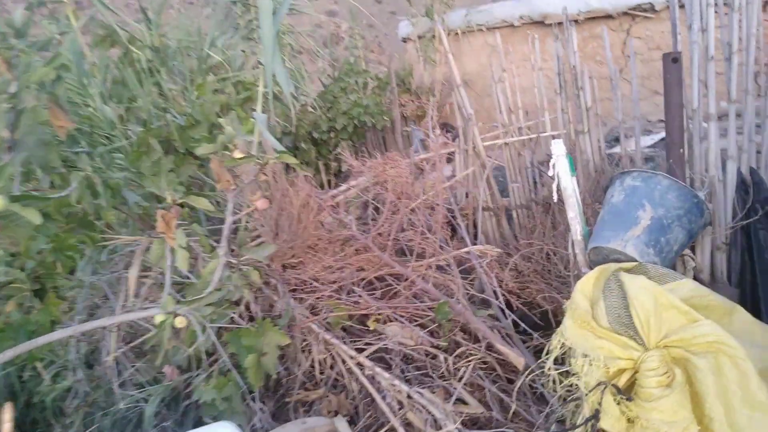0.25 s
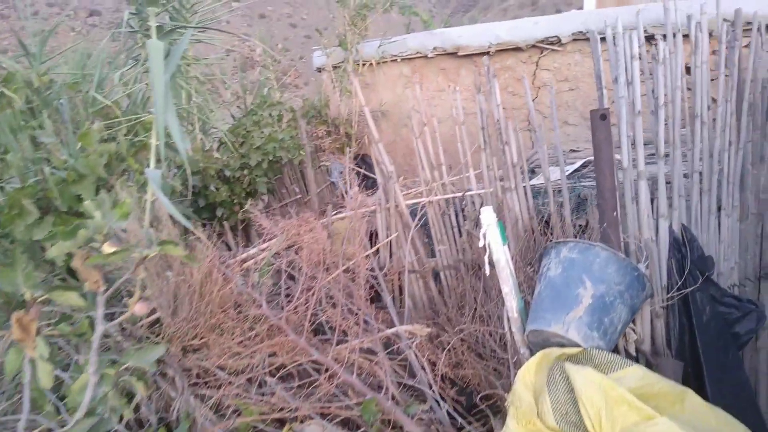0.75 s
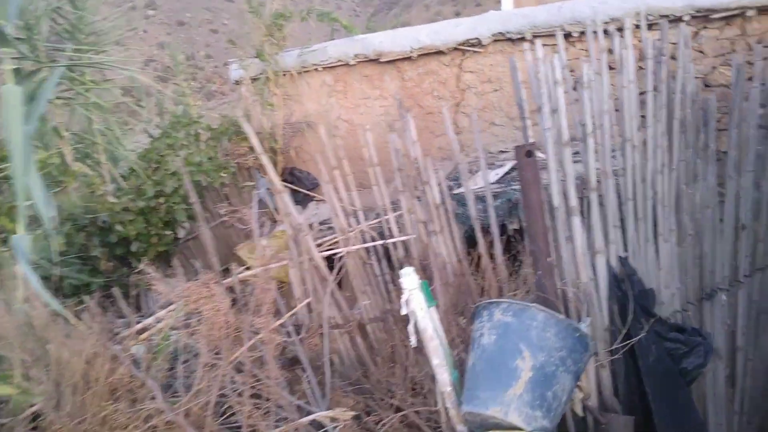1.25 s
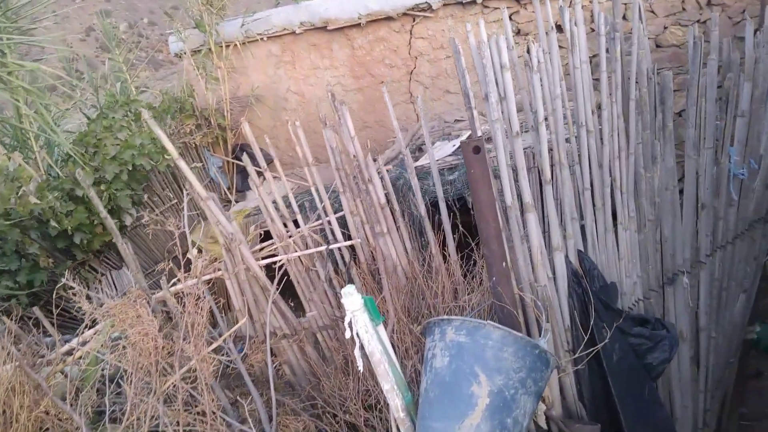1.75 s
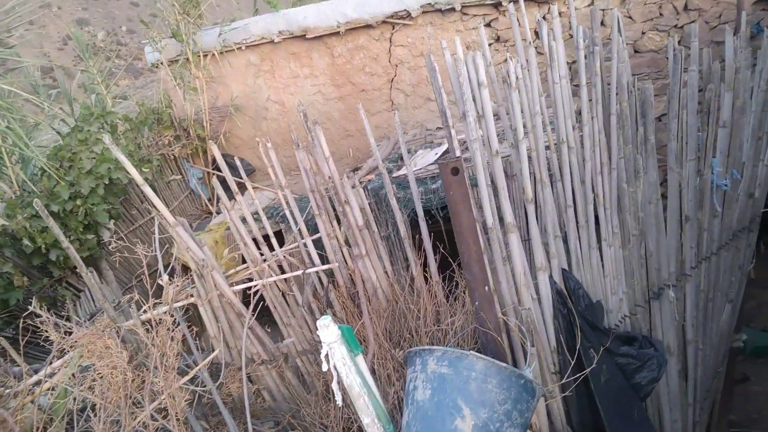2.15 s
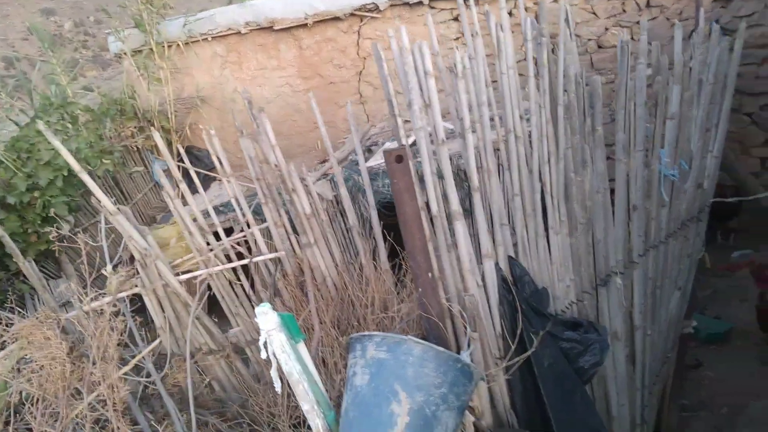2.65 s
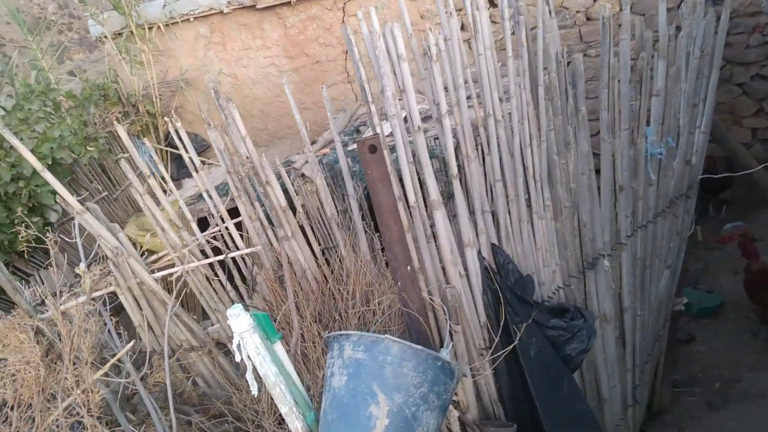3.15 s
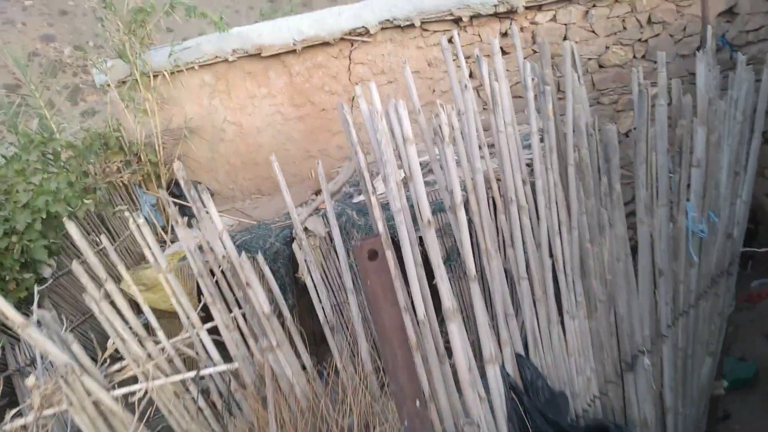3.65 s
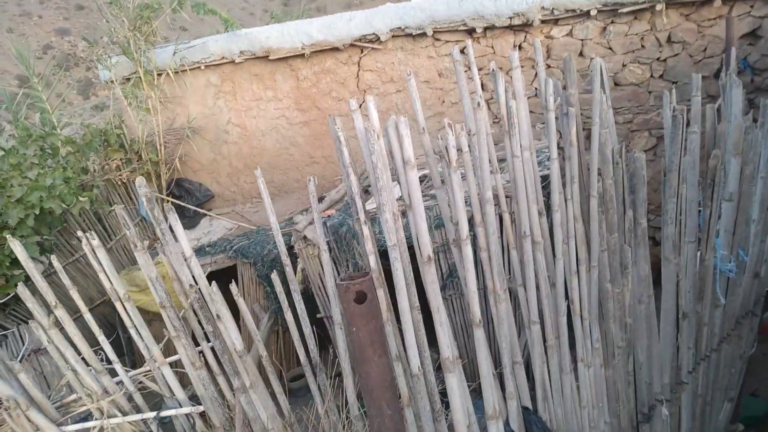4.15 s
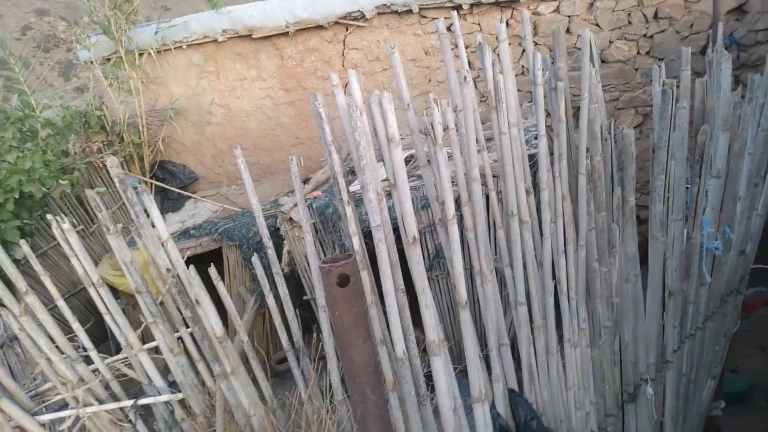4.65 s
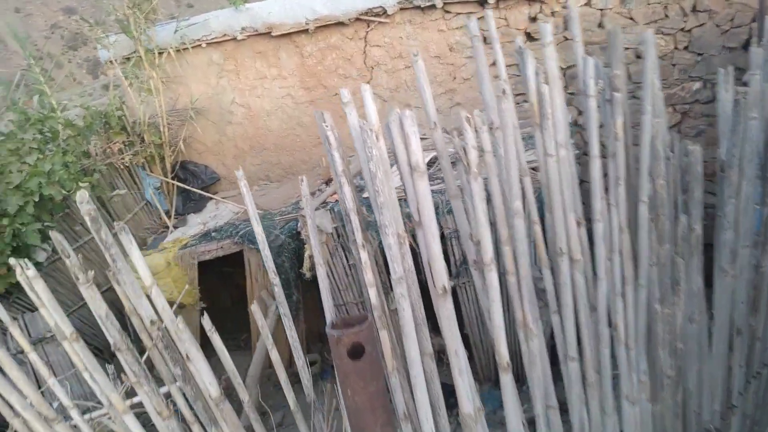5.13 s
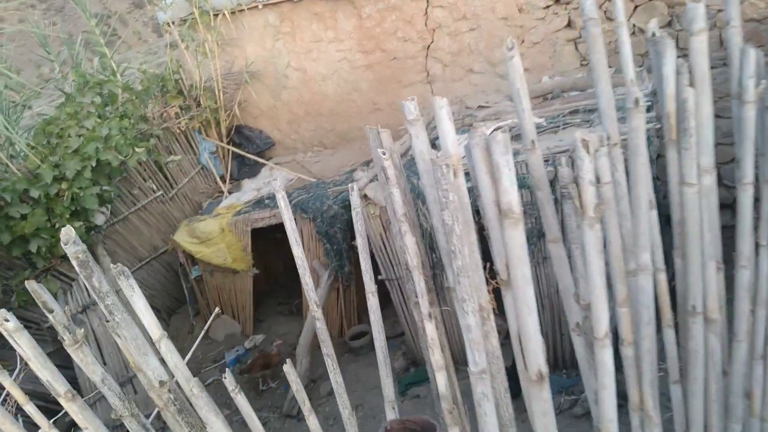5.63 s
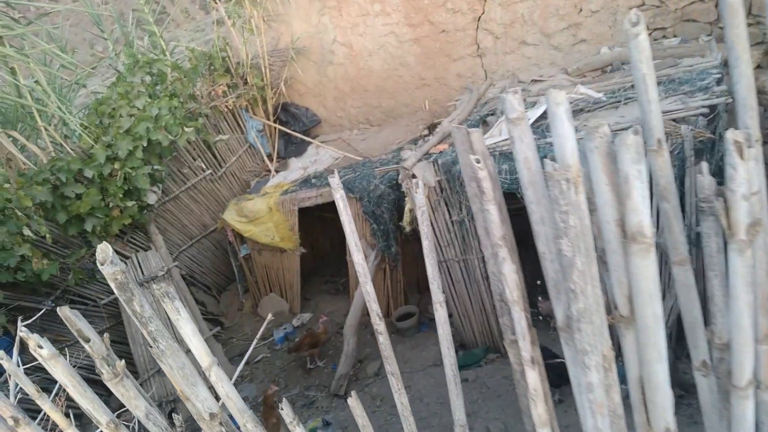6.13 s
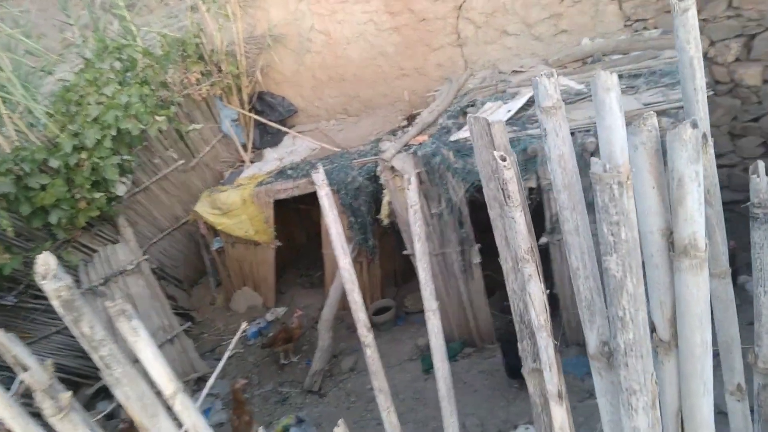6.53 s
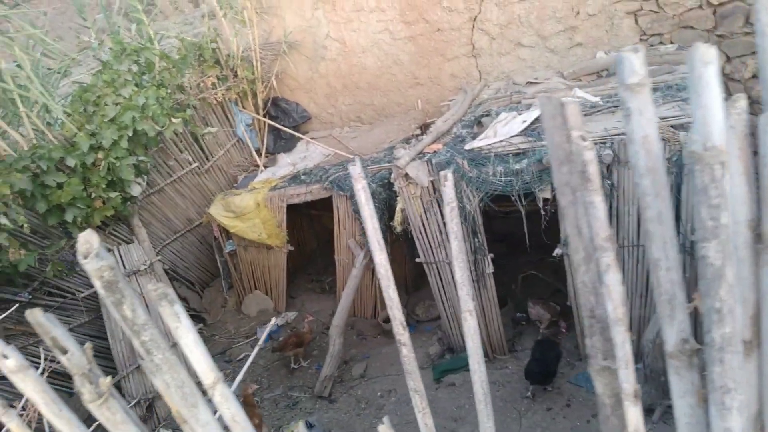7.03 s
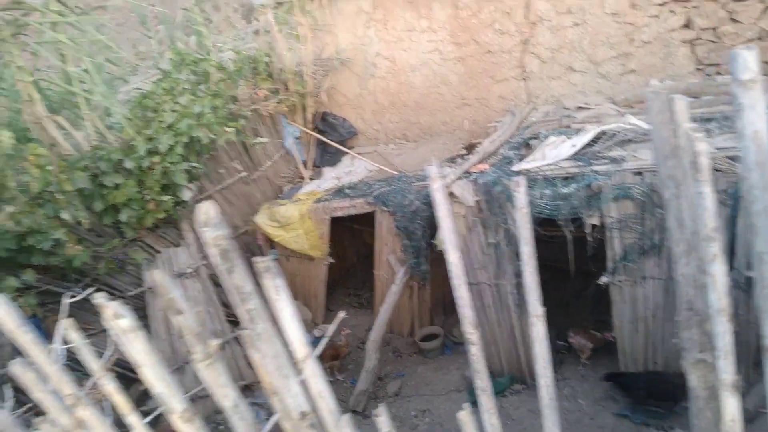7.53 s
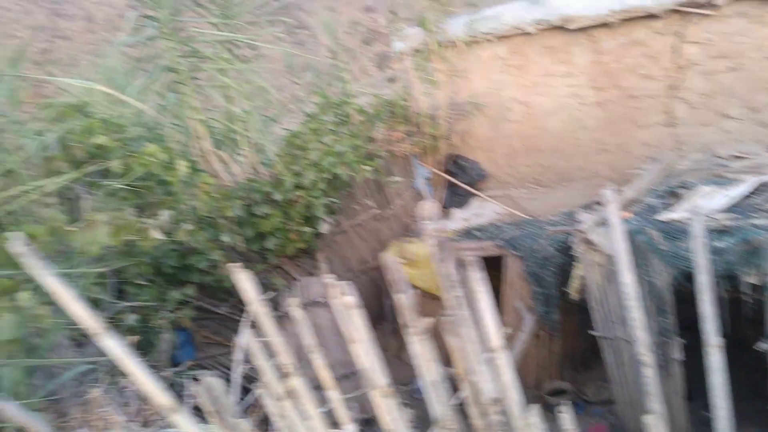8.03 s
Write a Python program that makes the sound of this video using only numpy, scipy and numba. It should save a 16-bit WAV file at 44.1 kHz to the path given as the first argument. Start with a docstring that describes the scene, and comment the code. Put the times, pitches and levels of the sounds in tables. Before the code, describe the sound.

Hens in a small yard between a mud wall and a cane fence. Sparse, low mutters come first, with a dry snap a little after two seconds. Near four seconds a quick run of loud, throaty clucks bursts out for under two seconds. After a lull and faint mutters, harsh bright squawks end it. Light wind rumbles on the handheld stereo microphone over a quiet hillside, with a short echo from the wall.

```python
"""Hens cluck in a small yard between a mud wall and a cane fence: soft mutters, a quick run of loud clucks, harsh squawks.
Each cluck is a short train of syrinx pulses ringing the throat, breaking into a rasp at its height.
Thin falling tones are gliding partials; short flickering bursts, snaps and ticks are shaped noise; bumps are dying tones.
The yard adds an echo, a short tail and a faint ring; light wind rumbles on the microphone over a quiet hillside.
"""
import sys
import numpy as np
from scipy import signal
from scipy.fft import rfft, irfft
from scipy.io import wavfile
from scipy.ndimage import map_coordinates
from numba import njit

SR = 44100
rng = np.random.default_rng(int(sys.argv[2]) if len(sys.argv) > 2 else 0)


def waveform_to_disk(signal):
    """Save audio, clipped to [-1, 1], as 16-bit WAV at the path in sys.argv[1]."""
    frames = np.transpose(np.atleast_2d(signal))
    scaled = np.clip(frames, -1, 1) * 32767
    samples = np.round(scaled).astype(np.int16)
    wavfile.write(sys.argv[1], SR, samples)


N = 365148
TIME = np.arange(N) / SR
SIZE = 8192  # samples in the frame of one short sound
LOCAL = (np.arange(SIZE) - SIZE // 2) / SR  # seconds from the height of a short sound

# spectrum of the noise bursts and ticks: frequency_hz, gain_db
DRY_NOISE = [(290, -27.5), (500, -6), (1060, -10.5), (1450, -12), (2040, -8.5), (2230, -9.5), (2570, -9),
             (2840, -11), (3630, -10.5), (5920, -16), (7560, -15), (15500, -36.5)]


def undb(db):
    """Decibels are logarithmic: 20 dB is a tenfold amplitude."""
    return 10 ** (np.asarray(db) / 20)


def unit(x):
    """Root-mean-square normalisation: equal mean power, whatever the waveform."""
    return x / np.sqrt(np.mean(x ** 2))


def colour(x, points):
    """Minimum-phase filtering: folding the cepstrum makes a causal filter from (frequency_hz, gain_db) points."""
    size = x.shape[-1]
    hz, db = np.transpose(points)
    bins = np.maximum(np.fft.rfftfreq(size, 1 / SR), 1)
    gain = undb(np.interp(np.log(bins), np.log(hz), db))
    cepstrum = irfft(np.log(gain), size)
    cepstrum[1:size // 2] *= 2
    cepstrum[size // 2 + 1:] = 0
    return irfft(rfft(x) * np.exp(rfft(cepstrum)), size)


@njit
def resonance(x, hz, width_hz):
    """Second-order resonance with a moving centre, where its gain is 1."""
    y, band, low = np.empty(len(x)), 0., 0.
    for i in range(len(x)):
        g = np.tan(np.pi * hz[i] / SR)
        k = width_hz / hz[i]  # damping
        v = (band + g * (x[i] - low)) / (1 + g * (g + k))
        band, low = 2 * v - band, low + 2 * g * v
        y[i] = k * v
    return y


def walk(rate, size):
    """Band-limited random fluctuation: random knots, rate of them a second, joined smoothly; spread near 1."""
    knots = rng.standard_normal(size // 8)
    return map_coordinates(knots, [np.arange(size) * rate / SR], order=2, mode="mirror")


def swell(rise, fall, edge_db=-14, shape=2.54):
    """Amplitude envelope: climbs from edge_db in rise seconds, returns to it in fall seconds."""
    side = np.where(LOCAL < 0, rise, fall)
    return undb(edge_db * np.abs(LOCAL / side) ** shape)


def split(length, rise_share):
    """Envelope asymmetry: a length divides into rise and fall times."""
    share = np.clip(rise_share, .1, .9)
    return length * share, length * (1 - share)


def follow(x, law):
    """Parameter covariation: interpolates the other columns of a table at x in its first."""
    known, *columns = np.transpose(law)
    return [np.interp(x, known, column) for column in columns]


def stereo_noise(size, likeness):
    """Partial coherence: two noises share the fraction likeness of their power."""
    shared = np.clip(likeness, 0, 1)
    noise = rng.standard_normal((3, size))
    return np.sqrt(shared) * noise[0] + np.sqrt(1 - shared) * noise[1:]


def place(x, pan_db, scatter_db=-2.5, scatter_s=0.011, lag_s=0.00022, wander_s=.0001):
    """Two-microphone localisation: level and lag differ between the ports, plus bounces off ground and canes."""
    t = LOCAL - LOCAL[0]
    bounces = rng.standard_normal((2, SIZE)) * np.exp(-t / scatter_s) * (t > .001)
    hz = np.fft.rfftfreq(SIZE, 1 / SR)
    scatter = rfft(unit(bounces)) / np.sqrt(SIZE) * undb(scatter_db)
    scatter = scatter * hz / np.hypot(hz, 900)  # long waves pass thin canes
    # each sound comes from a slightly different spot; long waves bend furthest round the recorder
    right_lag_s = lag_s + wander_s * rng.standard_normal()
    lag = np.array([[0], [right_lag_s]]) / np.hypot(1, hz / 1200)
    direct = np.exp(-2j * np.pi * hz * lag)
    balance = undb(np.array([[pan_db], [-pan_db]]) / 2)
    return irfft(rfft(x) * (direct + scatter)) * balance


def add(out, sound, s):
    """Superposition: a short sound adds to the mixture, centred on time s."""
    start = int(s * SR) - SIZE // 2
    lo, hi = max(start, 0), min(start + SIZE, N)
    out[:, lo:hi] += sound[:, lo - start:hi - start]


def effort_of(db):
    """Vocal effort: a louder sound takes a harder push, from 0.15 up to 1."""
    return np.interp(db, [-40, -22], [.15, 1])


def clucks(pan_db=0.45):
    """Vocal register: in single clucks the pitch sets both the roughness and the glide."""
    # full clucks, timed at the height: time_s, length_s, pitch_hz, level_db, throat_hz, treble_db
    full_clucks = [(0.161, 0.06, 189.2, -47, 950, 0), (0.347, 0.065, 197.3, -46.5, 950, 1.5),
                   (3.773, 0.035, 243.5, -33.5, 730, 3.5), (4.169, 0.055, 409, -25.5, 918, 8),
                   (4.33, 0.06, 397.4, -25.5, 870, 8), (4.488, 0.066, 379.7, -27.5, 724, 11),
                   (4.644, 0.048, 418.6, -25.5, 932, 5), (4.731, 0.043, 336, -38.5, 720, 6.5),
                   (4.814, 0.04, 330.5, -25.5, 760, 0), (4.935, 0.037, 281, -32, 840, 15),
                   (5.029, 0.045, 304.7, -27, 810, 2.5), (5.129, 0.042, 286.2, -30, 820, 14),
                   (5.304, 0.042, 383.7, -30.5, 874, 1.5), (5.488, .044, 399.7, -29, 913, 5.5),
                   (5.677, 0.035, 279.4, -29, 880, 11), (5.893, 0.026, 258.7, -31.5, 820, 3.5)]
    # a cluck pushed higher glides up faster: pitch_hz, roughness (0-1), glide (octaves per s)
    register = [(190, 0.21, -4), (291.5, 0.22, 1), (330.5, 0.5, 12.5), (387.5, .72, 14)]
    rise_share = .54  # of the length; the rest is the fall
    out = np.zeros((2, N))
    for s, length, pitch_hz, db, throat_hz, treble_db in full_clucks:
        rough, glide = follow(pitch_hz, register)
        rise, fall = split(length, rise_share)
        voice = cluck(rise, fall, pitch_hz, glide, effort_of(db), rough, throat_hz, treble_db)
        add(out, place(voice, pan_db) * undb(db), s)
    return out


def two_beat_calls(pan_db=-0.4, lead_length_s=0.029):
    """Two-beat phonation: mutters and squawks pair a short rising lead-in with a falling main beat."""
    # calls, timed at the main beat: time_s, length_s, level_db, throat_hz, treble_db,
    # lead_db (lead-in relative to the main beat)
    calls = [(.052, 0.025, -43, 875, 0, -7.5), (0.521, 0.034, -46, 643, -19, -34),
             (.836, 0.039, -45.5, 1300, -14, -7), (1.43, 0.034, -42, 480, 8, -5.5),
             (1.929, 0.034, -40.5, 756, 1, -9.5), (2.261, 0.051, -42.5, 750, 10, -3),
             (2.678, .026, -42.5, 436, 11.5, -4), (3.828, 0.04, -37, 460, 4.5, -25),
             (3.917, 0.03, -37, 995, 1, -24), (4.869, 0.061, -42, 750, 2, 0),
             (6.746, 0.017, -48, 726, -8, 1), (6.9, 0.019, -46, 620, -24, -31),
             (7.014, .035, -48, 560, -23, -6.5), (7.055, 0.015, -49, 740, -8, -25),
             (7.296, .018, -48.5, 375, 0, -27), (7.561, 0.025, -38.5, 1296, 3, -11),
             (7.633, .021, -46, 980, 2.5, -18), (7.776, 0.056, -43.5, 1215, 4, 0.5),
             (7.934, 0.059, -28, 1223, 12.5, -15), (8.079, 0.044, -30.5, 1176, 10, -4),
             (8.147, 0.031, -42, 990, 13, -4), (8.276, 0.031, -31.5, 980, 8, -6)]
    # the shortest beats never reach full pitch: length_s, pitch_hz
    beat_pitch = [(.018, 343), (0.026, 430.2), (.05, 410)]
    # harshness of the throat: throat_hz, roughness (0-1)
    harshness = [(465, 0.6), (800, 0.58), (1250, 0.8)]
    rise_share, beat_gap_s, lead_hz = 0.55, .034, 371
    lead_glide, main_glide = 14.5, -6  # octaves per s
    out = np.zeros((2, N))
    for s, length, db, throat_hz, treble_db, lead_db in calls:
        rough, = follow(throat_hz, harshness)
        main_hz, = follow(length, beat_pitch)
        lead_in = (s - beat_gap_s, min(length, lead_length_s), lead_hz, lead_glide, db + lead_db)
        main_beat = (s, length, main_hz, main_glide, db)
        for when, span, pitch_hz, glide, beat_db in [lead_in, main_beat]:
            rise, fall = split(span, rise_share)
            # both beats share one push, set by the level of the main beat
            voice = cluck(rise, fall, pitch_hz, glide, effort_of(db), rough, throat_hz, treble_db)
            add(out, place(voice, pan_db) * undb(beat_db), when)
    return out


def cluck(rise, fall, pitch_hz, glide, effort, rough, throat_hz, treble_db,
          jitter=0.24, shimmer_db=5, doubling=0.33, onset=1.12,  # jitter in octaves, onset in rises
          leap_s=0.02, scoop=.75, sag=.25, throat_glide=.8,  # scoop and sag in octaves
          rasp_db=-11, air_db=-30, body_db=-11, mellow_db=6, mouth_db=-6,
          beak_hz=3150, beak_db=0, chest_hz=130, strain=1.015):
    """Source-filter voice: syrinx pulses ring the throat, and stumble and rasp as roughness grows."""
    # resonances of the throat: frequency_hz, gain_db
    throat_spectrum = [(130, 2), (195, 15.5), (290, 9), (480, 6.5), (950, 5.5), (1200, -5), (1550, -15.5),
                       (2500, -25.5), (3200, -26.5), (4100, -31.5), (5200, -59.5), (7500, -53.5),
                       (15000, -55)]
    # spectrum of the hissing air: frequency_hz, gain_db
    rasp_spectrum = [(250, -26), (600, 27.5), (1000, -1.5), (1500, -1), (2100, -7.5), (2600, -1.5),
                     (3300, -11), (4100, -8), (5200, -15.5), (7400, -12.5), (15000, -53)]

    envelope = swell(rise, fall)
    push = envelope * np.clip((LOCAL + onset * rise) / 0.0072, 0, 1)  # the voice catches abruptly
    rough = np.clip(rough, 0, 1)
    chaos = rough * np.interp(LOCAL, [-rise, 0], [.35, 1])  # it starts cleaner, then breaks

    # the pitch scoops up, slides and sags
    slide = glide * leap_s * np.tanh(LOCAL / leap_s)
    dip = np.where(LOCAL < 0, scoop * effort, sag) * rough * (1 - envelope)
    bend = slide - dip  # octaves
    hz = pitch_hz * 2 ** (bend + jitter * chaos * walk(260, SIZE))
    cycles = np.cumsum(hz) / SR
    cycles -= cycles[SIZE // 2]

    offset = ((cycles + .5) % 1 - .5) * SR / hz  # samples from the nearest pulse
    pulses = np.sinc(offset) * np.exp(-(offset / 10) ** 2)
    pulses = pulses * undb(shimmer_db * chaos * walk(295.3, SIZE))
    # strong and weak pulses alternate when it breaks
    pulses = pulses * (1 + doubling * chaos * np.cos(np.pi * cycles))
    # a tight throat, above 900 Hz, shifts every resonance up
    tightness = max(throat_hz / 900, 1)
    source = colour(pulses * push, np.array(throat_spectrum) * [tightness, 1])

    # throat and mouth move with the pitch, the beak rings high; soft clucks keep more plain body
    centre = throat_hz * 2 ** (throat_glide * bend)
    beak = np.full(SIZE, beak_hz * 2 ** (.06 * rng.standard_normal()))
    voice = undb(body_db + mellow_db * (2.0 - effort)) * source
    voice = voice + resonance(source, centre, 150.0)
    voice = voice + undb(mouth_db) * resonance(source, 2.2 * centre, 110.0)
    voice = voice + undb(beak_db) * resonance(source, beak, 360.0)
    # a strained voice loses its fundamental
    low_cut_hz = chest_hz + strain * effort * rough * throat_hz
    voice = signal.sosfilt(signal.butter(2, low_cut_hz, "high", fs=SR, output="sos"), voice)
    # the pulses start round and only sharpen near the height
    round_part = colour(voice, [(1100, 0.5), (1500, -3), (2300, -20.5), (5000, -31)])
    sharp = swell(0.74 * rise, 2 * fall)
    voice = unit(sharp * voice + (1 - sharp) * round_part) * np.sqrt(np.mean(push ** 2))

    # air hisses through the syrinx once a cycle
    puffs = rng.standard_normal(SIZE) * (.25 + np.exp(-(cycles % 1) / .3))
    hiss = colour(puffs, rasp_spectrum)
    hiss = unit(hiss + resonance(hiss, beak, 240.))
    breath_level = undb(air_db) * swell(rise, 2.26 * fall)
    rasp_level = undb(rasp_db) * chaos * push ** 2
    # a wider beak lets more treble out
    return colour(voice + hiss * (breath_level + rasp_level), [(1100, 0.0092), (2000, treble_db)])


def thin_tones():
    """Spectral fusion: brief thin falling tones; some pair up as parts of one cry, one sounds within a squawk."""
    # tones, timed at the height: time_s, length_s, pitch_hz, level_db
    tones = [(0.779, .041, 2060, -53.5), (0.999, 0.022, 536, -51), (2.47, 0.027, 1220, -58),
             (3.319, 0.031, 1183, -43.5), (3.335, 0.034, 782, -50.5), (6.285, 0.027, 740, -46),
             (6.297, 0.017, 1360, -46.5), (7.933, 0.01, 2042, -27), (8.262, 0.0084, 2800, -47.5)]
    out = np.zeros((2, N))
    for s, length, pitch_hz, db in tones:
        add(out, thin_tone(length, pitch_hz) * undb(db), s)
    return out


def thin_tone(length, pitch_hz, waver=0.0665, steepest=12):
    """Harmonic synthesis: a falling tone of three partials; waver in octaves, steepest in octaves per s."""
    # only the lowest tones are rich in overtones: pitch_hz, step_db (per overtone)
    overtones = [(530, -3), (740, -21), (1200, -30)]
    fall_hz_per_s, rise_share = 9600, 0.38
    glide = -min(fall_hz_per_s / pitch_hz / np.log(2), steepest)  # octaves per s
    overtone_db, = follow(pitch_hz, overtones)
    hz = pitch_hz * 2 ** (glide * LOCAL + waver * walk(396.4, SIZE))
    phase = 2 * np.pi * np.cumsum(hz) / SR
    note = sum(undb(k * overtone_db) * np.sin((k + 1) * phase) for k in range(3))
    return place(unit(note) * swell(*split(length, rise_share)), 0)


def noise_bursts(grain_db=3, clump_db=2):
    """Modulated noise: short bursts flicker in fine grains and slower clumps, several under the loud calls."""
    # bursts, timed at the height: time_s, length_s, level_db, brightness_db
    bursts = [(0.375, 0.011, -58, 1.5), (.58, 0.13, -71, 4), (.672, 0.027, -59.5, 4),
              (0.824, 0.1, -56.5, -5.5), (0.902, 0.028, -66.5, 3.5), (1.014, 0.033, -57.5, -7),
              (1.157, 0.02, -65.5, 4), (2.199, .1, -58, 14.5), (2.288, 0.16, -53.5, 2),
              (2.298, 0.049, -49, 17), (2.454, 0.032, -58, 13.5), (2.785, 0.05, -64.5, 9),
              (3.269, 0.06, -60, 1), (3.343, 0.032, -56.5, -5), (4.215, 0.05, -45, -6),
              (4.453, 0.061, -50.5, 4), (4.86, .066, -53.5, -4.5), (5.395, 0.049, -60, 2.5),
              (6.133, 0.035, -64, 9.5), (7.01, 0.051, -60.5, -6.5), (7.363, 0.036, -52.5, -3),
              (7.398, 0.048, -56.5, 0), (7.555, 0.11, -58, 1), (7.734, 0.1, -57.5, 0),
              (7.831, 0.044, -54, -3), (7.947, 0.093, -42, 0), (8.043, 0.029, -44, 1),
              (8.108, 0.15, -51, 2)]
    rise_share = 0.51
    out = np.zeros((2, N))
    for s, length, db, bright_db in bursts:
        flicker_db = grain_db * walk(900, SIZE) + clump_db * walk(115.5, SIZE)
        burst = stereo_noise(SIZE, 0.11) * undb(flicker_db)
        burst = unit(colour(burst, DRY_NOISE))
        burst = colour(burst, [(3000, 0), (8000, bright_db)])
        add(out, burst * swell(*split(length, rise_share)) * undb(db), s)
    return out


def knocks(snap_s=0.0007, bump_s=0.0038):
    """Impulsive excitation: dry snaps are decaying noise; soft bumps are tones that die in milliseconds."""
    # dry snaps: start_s, level_db (before the snap's filter)
    snaps = [(2.2955, -20.5), (2.308, -9.5), (2.311, -27.5), (4.439, -30)]
    # soft bumps: start_s, pitch_hz, level_db
    bumps = [(0.108, 217, -27.5), (1.153, 402, -37), (3.646, 380, -40), (5.244, 237, -37.5),
             (8.041, 190, -33)]
    out, age = np.zeros((2, N)), np.maximum(LOCAL, 0)
    for s, db in snaps:
        crack = stereo_noise(SIZE, .5) * np.exp(-age / snap_s) * (LOCAL >= 0)
        add(out, colour(crack, [(1000, -20), (7500, 0), (15000, -14.5)]) * undb(db), s)
    for s, hz, db in bumps:
        bump = np.sin(2 * np.pi * hz * age) * np.exp(-age / bump_s)
        add(out, place(bump * undb(db), 0), s)
    return out


def ticks(tick_db=-76, spread_db=7, count=70):
    """Random point process: faint dry ticks of noise fall at chance times."""
    out = np.zeros((2, N))
    for when, size, length in rng.random((count, 3)):
        tick = unit(colour(stereo_noise(SIZE, .5), DRY_NOISE))
        tick = tick * swell(.002, .004 + .018 * length)
        add(out, tick * undb(tick_db + spread_db * size), when * N / SR)
    return out


def yard(x):
    """Impulse response: the mud wall echoes, canes and brush scatter a short tail, the hollow coop rings faintly."""
    tail_t60_s, tail_db = 0.088, -11.5  # tail and wall levels are before the reflection filter
    wall_delay_s, wall_db = .0225, -16
    coop_hz, coop_width_hz = 910.0, 160.0
    coop_t60_s, coop_db = 0.24, -31  # level of the noise that feeds the resonance
    t = np.arange(SR // 2) / SR
    tail = rng.standard_normal((2, len(t))) * undb(-60 * t / tail_t60_s) * (t > .005)
    response = undb(tail_db) * tail / np.sqrt(np.sum(tail ** 2) / 2)
    response[:, int(wall_delay_s * SR)] += undb(wall_db)
    response = colour(response, [(250, 1.5), (800, -12.5), (3000, 0.5), (10000, -1.0)])
    for side in response:
        ring = rng.standard_normal(len(t)) * undb(-60 * t / coop_t60_s)
        ring = ring / np.linalg.norm(ring)
        side += undb(coop_db) * resonance(ring, np.full(len(t), coop_hz), coop_width_hz)
    return x + signal.fftconvolve(x, response, axes=1)[:, :N]


def outdoors(wind_db=1, flicker_db=1):
    """Ambient noise: a soft hillside hush, and wind turbulence nearly independent at each microphone port."""
    # spectrum of the hillside: frequency_hz, gain_db
    hillside = [(12, -16.5), (20, -1.5), (32, -13.5), (106, -16.5), (144, -18), (185, -21), (315, -22),
                (352, -28), (491, -28), (565, -30.5), (686, -35), (788, -34.5), (1230, -51.5),
                (3000, -51.5), (15500, -65.5)]
    # spectrum of wind on the ports: frequency_hz, gain_db
    wind_spectrum = [(5, -6.5), (15, -6.5), (30, -22.5), (60, -23), (150, -44.5), (400, -46.5),
                     (1500, -106.5)]
    # course of the wind: time_s, level_db (wind_db is added to it)
    gusts = [(0.0, -33.5), (0.18, -43.5), (0.6, -43), (1.59, -49.5), (3.55, -47.5), (3.62, -42), (4.2, -50),
             (8.28, -46.5)]
    hillside_db = -55
    hush = unit(colour(stereo_noise(N, 0.19), hillside))
    hush = hush * undb(hillside_db + flicker_db * walk(2.025, N))
    wind = unit(colour(stereo_noise(N, 0.04), wind_spectrum))
    return hush + wind * undb(wind_db + np.interp(TIME, *np.transpose(gusts)))


def scene():
    """Superposition: calls, thin tones, noise bursts and knocks sound in the yard, over the open air."""
    tonal = clucks() + two_beat_calls() + thin_tones()
    noises = noise_bursts() + knocks() + ticks()
    return yard(tonal + noises) + outdoors()


def record(dry):
    """Transducer response: the left port is brighter in the presence range; the recorder cuts the top."""
    top_hz = 15550
    left = colour(dry[0], [(1500, 1.0), (4400, 4.25), (9000, 0.98)])
    right = colour(dry[1], [(1500, 1), (4400, -2.0), (9000, 0.5)])
    top_cut = signal.ellip(10, .1, 80, top_hz, fs=SR, output="sos")
    return signal.sosfilt(top_cut, np.array([left, right]))


dry = scene()
out = record(dry)
waveform_to_disk(out)
```